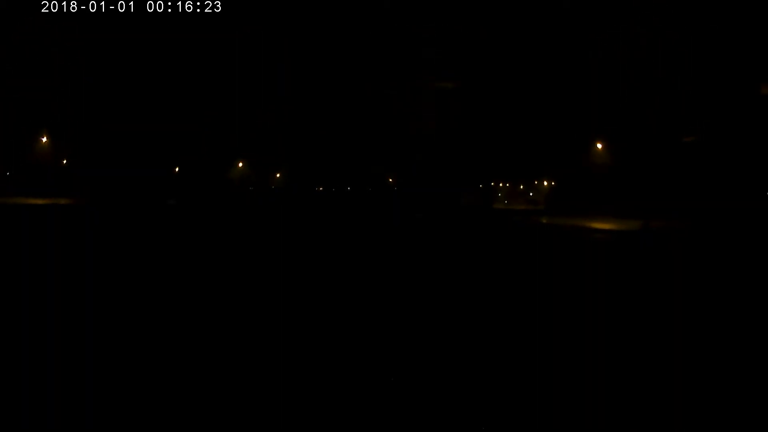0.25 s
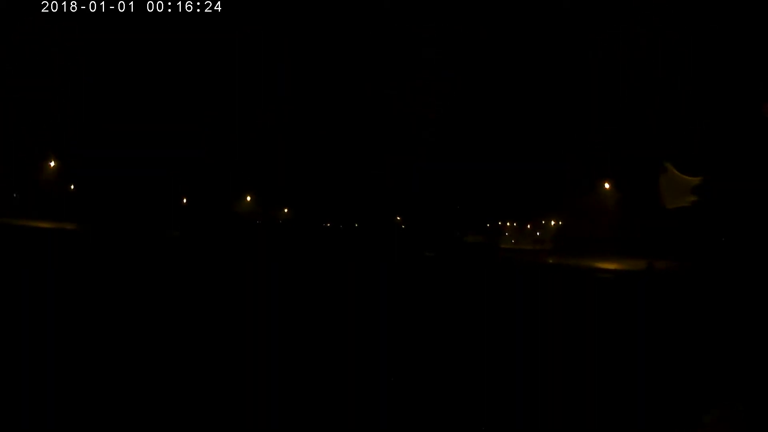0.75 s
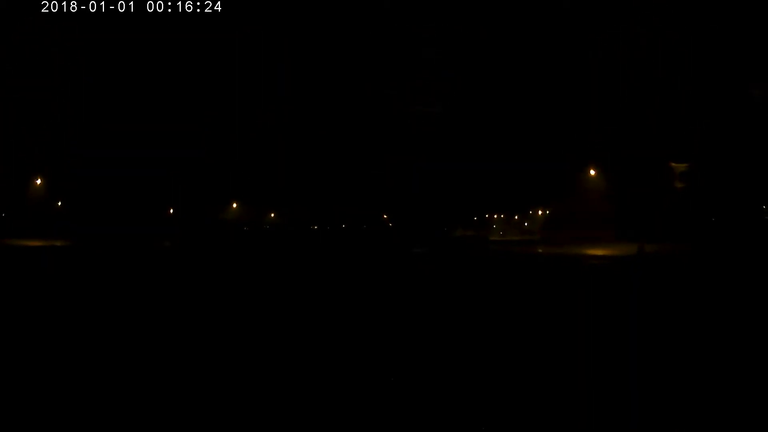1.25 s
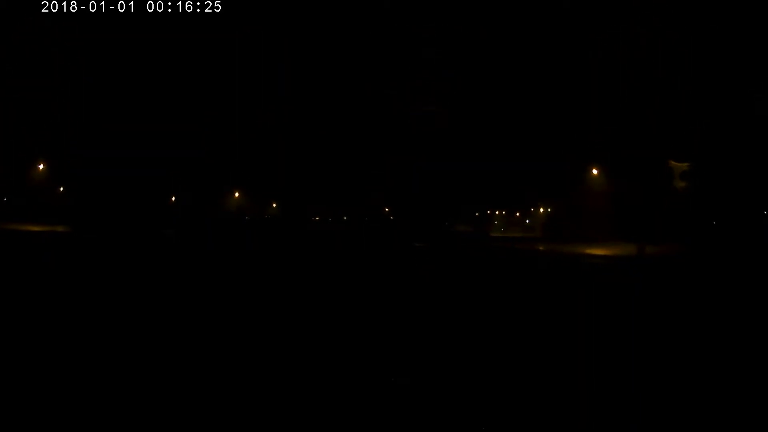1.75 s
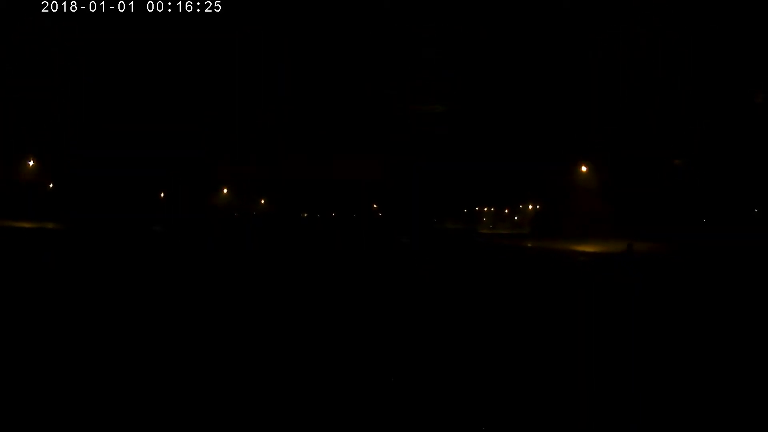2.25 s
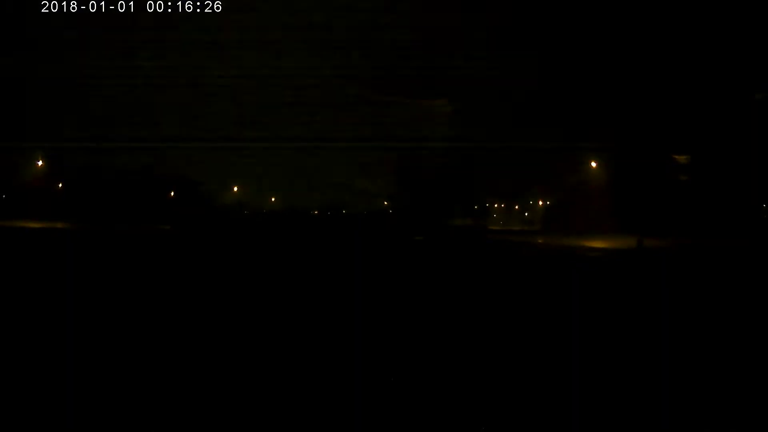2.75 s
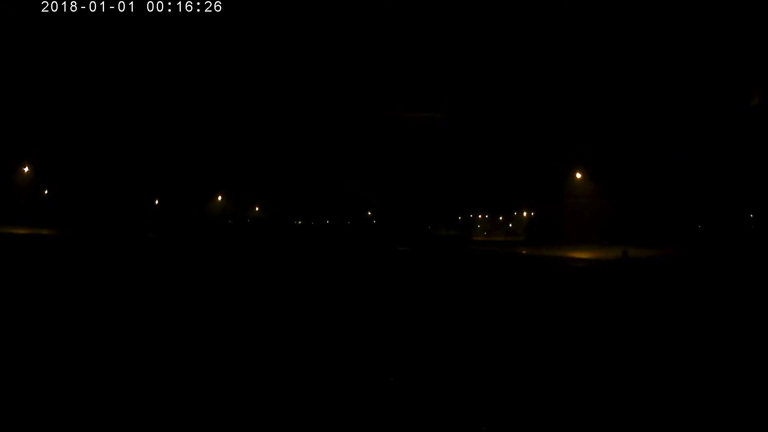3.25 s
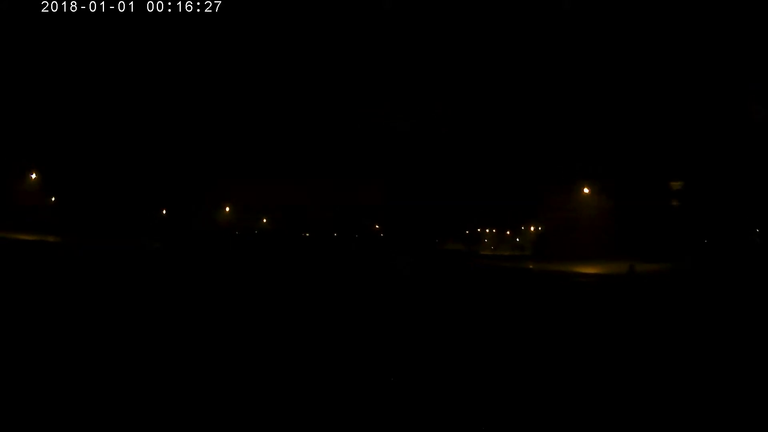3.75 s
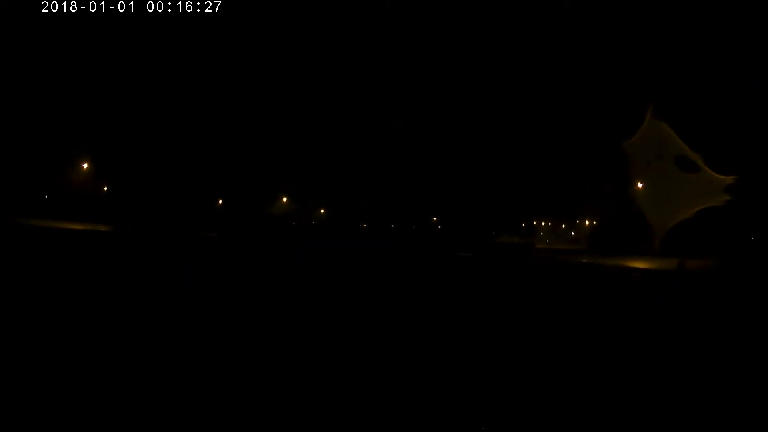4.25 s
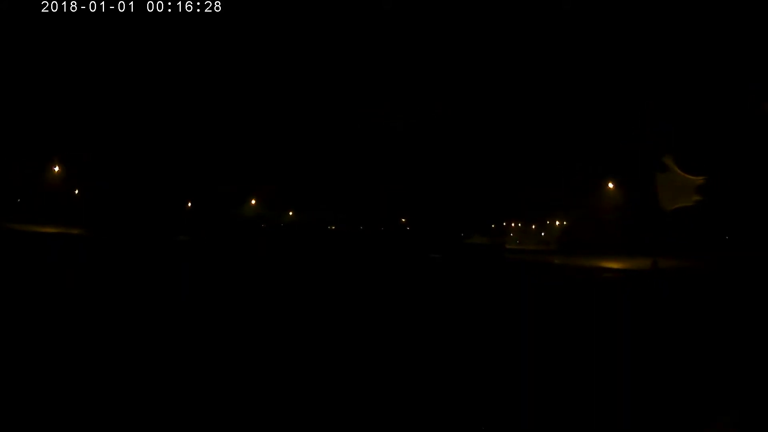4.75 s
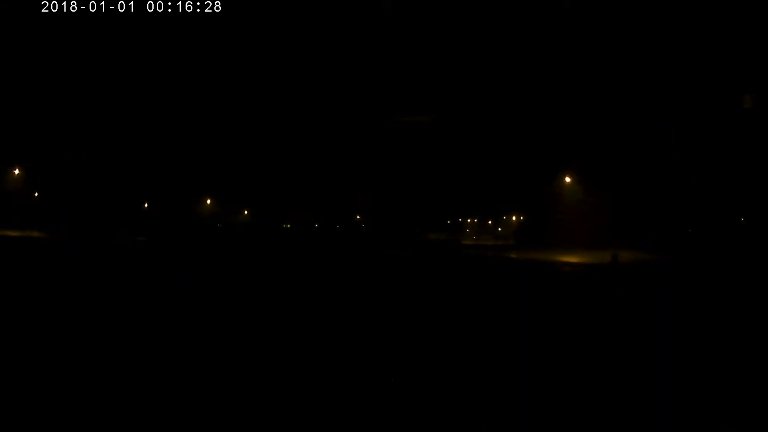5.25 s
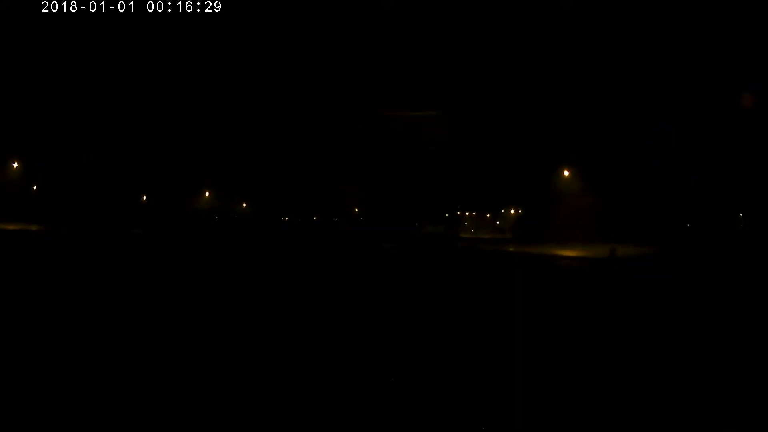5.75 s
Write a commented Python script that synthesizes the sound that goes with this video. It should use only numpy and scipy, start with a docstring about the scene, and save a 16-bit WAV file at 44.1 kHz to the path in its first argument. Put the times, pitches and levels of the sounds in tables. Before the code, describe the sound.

Outdoors at night, rain falls on a plastic cover around the microphone. Sharp, dry, irregular taps of every strength come without pause, the largest loud and slightly distorted. Fine patter and a faint wash of ground rain lie beneath, with soft low flaps of the sheet and wind rumble. The sound is close and dull in the treble.

```python
"""Rain on a plastic cover

Each large drop is an impact that excites a few damped modes of the cover; small drops patter between
them over a wash of rain on the ground. The slack sheet flaps in low thuds, and wind heaves and rumbles
at the microphone. The microphone is dull in the treble, faint bands fall silent, more of them just
after loud blows, and the largest drops overload the recorder."""
import sys
import numpy as np
from scipy import signal
from scipy.io import wavfile
from scipy.ndimage import uniform_filter1d

SR = 44100
rng = np.random.default_rng(int(sys.argv[2]) if len(sys.argv) > 2 else 0)


def file_out(sig):
    """Save sig as 16-bit WAV at sys.argv[1]."""
    # one column per channel
    cols = np.atleast_2d(sig).T
    # limit, then scale
    lim = np.clip(cols, -1, 1)
    pcm = np.round(lim * 32767).astype(np.int16)
    wavfile.write(sys.argv[1], SR, pcm)


N = 264600  # samples, 6 s


def amp(db):
    """Decibel law: amplitude gain of a level in dB."""
    return 10 ** (np.asarray(db) / 20)


def evened(x):
    """Normalisation: scales a signal to an rms of 1."""
    return x / np.sqrt(np.mean(x ** 2) + 1e-20)


def over_time(rows):
    """Level envelope: gain at every sample, linear in dB between rows of start_s, level_db."""
    start_s, level_db = np.transpose(rows)
    return amp(np.interp(np.arange(N) / SR, start_s, level_db))


def noise(colour, patchy_db, size):
    """Spectral synthesis: random short-time spectra of a given colour and drifting patches, at rms 1."""
    bin_hz = np.fft.rfftfreq(size, 1 / SR)
    pitch_hz, density_db = np.transpose(colour)
    frames = 4 * N // size + 5
    real, imaginary, patches = rng.standard_normal((frames, len(bin_hz), 3)).T
    patches = uniform_filter1d(patches, size=12, axis=0)  # smooth across frequency
    patches = evened(uniform_filter1d(patches, size=8, axis=1))  # smooth across time
    colour_db = np.interp(np.log(bin_hz + 1), np.log(pitch_hz + 1), density_db)[:, None]
    spectra = (real + 1j * imaginary) * amp(colour_db + patchy_db * patches)
    return evened(signal.istft(spectra, nperseg=size, noverlap=3 * size // 4)[1][:N])


# Modes of the cover in five groups: low, boxy, upper, top, main pair.
# Columns: pitch_hz [Hz, before detuning], level_db [dB, before the group's level], t60_s [s]
COVER_MODES = [
    [(210, -2.5, 0.014), (363.8, 6.5, 0.023)],
    [(797.3, 6.5, 0.014)],
    [(1640, 8, 0.007), (2392, -7.5, 0.022), (2860, -19.5, 0.026)],
    [(3159, 3.5, 0.0089), (3360, -2, 0.019), (4290, -0.5, 0.0059)],
    [(1109, 2.5, 0.022), (1432.8, 0.5, 0.018)],
]


def cover(start_s, blow_db, place_db, splash_s, detune):
    """Modal synthesis: a blow rings damped sines, whose balance and tuning vary with the landing spot."""
    t = np.arange(1800) / SR
    chance = rng.standard_normal((len(start_s), 2, sum(map(len, COVER_MODES))))
    place_db = np.column_stack([place_db, np.zeros(len(start_s))])  # the main pair stays at 0 dB
    rings = np.zeros((len(start_s), len(t)))
    k = 0
    for group, modes in enumerate(COVER_MODES):
        for pitch_hz, level_db, t60_s in modes:
            detuned_hz = pitch_hz * (1 + detune * chance[:, 0, k, None])
            phase = 2 * np.pi * detuned_hz * t + .3 * chance[:, 1, k, None]
            decay = amp(place_db[:, group, None] + level_db - 60 * t / t60_s)
            rings += decay * np.sin(phase)
            k += 1
    rings *= 1 - np.exp(-(t / splash_s) ** 2)  # the drop takes a moment to flatten
    out = np.zeros(N + len(t))
    at = np.round(start_s * SR).astype(int)[:, None] + np.arange(len(t))
    np.add.at(out, np.clip(at, 0, len(out) - 1), -amp(blow_db)[:, None] * rings)
    return out[:N]


# Colour of rain on the ground. Columns: pitch_hz [Hz], density_db [dB per Hz, relative]
WASH_COLOUR = [(59, -50.5), (100, -2.5), (378, -5.5), (472, -11), (875, -9), (1110, -5), (1280, -16),
               (1900, -15), (2740, -24), (3260, -11), (4400, -57), (5720, -96.5), (9680, -120)]
# Course of small and far drops. Columns: start_s [s], level_db [dB, before each layer's trim]
PATTER_LEVEL = [(0.0, -42), (1.02, -47), (1.29, -51.5), (1.64, -44.5), (2.22, -48.5), (2.37, -44.5),
                (3.32, -43), (3.68, -46.5), (3.98, -44.5), (4.16, -46.5), (4.48, -50.5), (4.91, -40),
                (5.03, -47.5), (5.65, -53), (5.76, -46), (6.0, -45)]
PATTER_PER_S = 68  # small drops per second


def patter():
    """Random arrivals: many small drops at chance moments, a few stronger, over a wash of far rain."""
    draws = rng.random((int(PATTER_PER_S * N / SR), 6))
    start_s = draws[:, 0] * N / SR
    size_db = -5.5 * np.log(1 - .98 * draws[:, 1])  # exponential spread: strong drops are rare
    # low, boxy, upper and top levels, each up to 7 dB either way
    place_db = np.array([-7.0, -5.5, -2, -21.5]) + 14 * (draws[:, 2:] - .5)
    taps = cover(start_s, size_db, place_db, splash_s=0.0005, detune=0.053)
    wash = noise(WASH_COLOUR, patchy_db=5.0, size=1024)
    return over_time(PATTER_LEVEL) * (amp(-0.5) * evened(taps) + amp(0.5) * wash)


# Course of the heave. Columns: start_s [s], level_db [dB]
WIND_LEVEL = [(0.0, -31), (0.13, -38), (0.2, -29.5), (0.25, -42), (1.12, -34.5), (2.82, -45.5),
              (2.86, -32.5), (3.74, -48.5), (3.84, -30), (4.19, -46), (5.97, -50.5), (6.0, -56)]
# Colour of the heave. Columns: pitch_hz [Hz], density_db [dB per Hz, relative]
GUST_COLOUR = [(4, 0.5), (14, 5), (30, 6.5), (50, -17.5), (90, -42)]
# Colour of the rumble. Columns: pitch_hz [Hz], density_db [dB per Hz, relative]
RUMBLE_COLOUR = [(25, -28.5), (50, -2.5), (120, 1), (250, -8), (500, -31.5)]
RUMBLE_DB = -45.5  # rms level


def wind():
    """Flow noise: slow heave of air at the microphone port, and a lumpy rumble above it."""
    heave = over_time(WIND_LEVEL) * noise(GUST_COLOUR, patchy_db=2.0, size=8192)
    return heave + amp(RUMBLE_DB) * noise(RUMBLE_COLOUR, patchy_db=6.0, size=2048)


# Flaps of the slack sheet. Columns: start_s [s], level_db [dB, before a 5.5 dB lift], pitch_hz [Hz]
FLAPS = [(0.015, -23, 66), (0.086, -25, 45.4), (0.229, -28, 141), (0.518, -28, 117), (0.799, -26.5, 104),
         (1.481, -27, 65.4), (1.815, -30, 75.5), (2.747, -31, 92), (2.869, -30.5, 112.5), (3.189, -30, 99),
         (3.838, -28.5, 73), (4.716, -27.5, 45), (5.035, -24, 120.4), (5.432, -51, 113),
         (5.545, -58, 120.6)]


def thuds():
    """Damped oscillation: each flap of the slack sheet is a few soft low cycles."""
    t = np.arange(6000) / SR
    out = np.zeros(N + len(t))
    for start_s, level_db, pitch_hz in FLAPS:
        decay = amp(level_db + 5.5 - 60 * t / 0.089)
        onset = 1 - np.exp(-t / 0.0033)
        out[round(start_s * SR):][:len(t)] -= decay * onset * np.sin(2 * np.pi * pitch_hz * t)
    return out[:N]


# Large drops; the last three columns depend on where the drop lands.
# Columns: start_s [s], blow_db [dB], hollow_db [dB], bright_db [dB], crisp_db [dB]
LARGE_DROPS = [(0.0275, -15.5, 4, -23, -9), (0.1039, -1, -4.5, -1, -15.5), (0.228, -27, -3, 3, -10),
               (0.2421, -5, -3, -7.5, -11.5), (0.303, -14, -5, 2.5, -12), (0.442, -28.5, -1, -9, -39),
               (0.466, -12, -4, -12.5, -41), (0.4754, -30, -4.5, 8, 1), (0.5333, -30, 8, -3, -23),
               (0.5481, -15, -9.5, -8, -9), (0.601, -13.5, -11, -18, -16), (0.6662, -25, -11, -1.5, -7.5),
               (0.7328, -19, -17.5, -3.5, -12.5), (0.7968, -26, 3, -5.5, -1.5),
               (0.8128, -11.5, -8, -0.5, -8.5), (0.8418, -23.5, 5.5, -3, -9.5), (0.9046, -13, -5, -6, -16),
               (0.9205, -20.5, -9, -12, -4.5), (0.9379, -17.5, -6, -16, -11), (1.052, -33, 2, -7, -3),
               (1.0605, -4, -14.5, -1, -3), (1.0994, -26.5, -1, -1, 1.5), (1.1542, -3, -15.5, -17, -14.5),
               (1.1724, -10, -6, -10, -9), (1.191, -27.5, 2, 2, 0), (1.1987, -23, -10, -8, -9),
               (1.2804, -19, -6, -9, -14.5), (1.2954, -19, -0.5, -7, -8), (1.3797, -7.5, -17, -16, -15.5),
               (1.476, -30, 3, -7, -7), (1.482, -26, 1.5, -1.5, -7), (1.5269, -29, -2, -18, -44),
               (1.6045, -3, -10.5, -14, -21), (1.671, -25.5, -2, 2, -12.5), (1.6832, -27.5, -9, -21, -21),
               (1.7639, -11.5, -4, -7, -21.5), (1.8386, -25, -17, 5, -4), (1.9807, -15, -18, -2, -14),
               (1.99, -30.5, 3.5, 16, -11), (2.0019, -25, -20, -3, 1.5), (2.0408, -22, 7, -24, -19),
               (2.1256, -20.5, -14, -2, -23), (2.1685, -22, -8, -9.5, -22), (2.2039, -13.5, -3, 1.5, -19),
               (2.2283, -7.5, -9, -13, -23), (2.3021, -19, -9.5, -17, -20), (2.4193, -27, -5, -10, -26),
               (2.471, -23, -7, -19, -18), (2.4788, -20.5, -8, -16, -16), (2.536, -27, 2, 4, -3),
               (2.5513, -25, 6.5, -5, -20), (2.579, -19.5, -1.5, -16, -33), (2.647, -7, -19, 1.5, -3.5),
               (2.6512, -19, -6, -11, -29), (2.6639, -16, -6, 2, -2), (2.7488, -23, -9, -7, -10),
               (2.7542, -22.5, 3.5, -21, -21.5), (2.7706, -23.5, -9, -1, -28), (2.782, -24.5, -4, -3, -7),
               (2.8582, -22, -12, -1, -7), (2.8684, -20, -9, -16, -12), (2.8818, -8, 1.5, 3, -11.5),
               (2.9029, -18, 3.5, -28, -27), (2.9261, -12.5, -0.5, -4, -9), (2.9313, -1, 0.5, -4.5, -15),
               (3.0239, -17, -13, 0.5, -25), (3.0448, -16, -11, 1, -16), (3.1028, -25.5, -10, -16, -12),
               (3.155, -36, -11, 6, 10.5), (3.193, -25, -2, 0.5, -13), (3.2245, -28, 4, -11, -15),
               (3.3154, -21.5, -5, 7, -21), (3.3279, -3.5, -7, -9.5, -6), (3.3754, -26, 4, 3.5, -48),
               (3.387, -33.5, 15, 4, -2), (3.404, -11.5, -16, -1, -1.5), (3.4643, -2, -13.5, -6.5, -9.5),
               (3.502, -34.5, -10, -14, -36), (3.5971, 0, -16, -5.5, -12), (3.6159, -30, -7, -3, 7),
               (3.6358, -18.5, -17, 2, -28), (3.6522, -10.5, -7.5, -3, -11), (3.778, -27.5, -8, 4, -18),
               (3.798, -10.5, -7, -4, -12.5), (3.817, -23.5, -6, -3, -15), (3.8603, -24, -1, -5, -10.5),
               (3.9063, -28.5, -10, 4.5, 2.5), (3.912, -24.5, -4, -21, -15), (3.9385, -24.5, 1.5, -17, -31),
               (4.0259, -2, -9.5, -15, -18.5), (4.0929, -9, -24, -2.5, -15),
               (4.1217, -15.5, -0.5, -2, -13.5), (4.1384, -19, -12, -9, -1), (4.3002, -28.5, -7, -8, -15.5),
               (4.3776, -23.5, -10, -20, -47), (4.4047, -16.5, -8.5, -5, 0), (4.444, -27.5, 0.5, -10, -36),
               (4.5121, -27.5, 0.5, -7, -10), (4.6259, -26, -5, -1, 2.5), (4.6818, -29, -5, -5, -2),
               (4.6966, -28.5, -2, -19.5, -29), (4.7191, -22, -6, -19, -12),
               (4.7293, -2, -5.5, -24.5, -14.5), (4.828, -15.5, -9.5, -14, -23),
               (4.8566, -22, -4.5, -14, 6.5), (4.8678, -21, -1, -16, 1), (4.8798, -2, -13, -9, -16.5),
               (4.894, -24.5, -18, -17, 1.5), (4.9122, -20, -22, -13, -26.5), (5.0015, -28.5, 5, -6, 2),
               (5.0265, -9, -11.5, -1, -0.5), (5.0478, -19, 8, 2.5, 4.5), (5.1321, -9, -24, -31.5, -11.5),
               (5.163, -18.5, -2.5, -24, -45), (5.2845, -17, -23, 4, -7.5), (5.3339, -11, -7.5, -12, -12.5),
               (5.3613, -26.5, -12, 3, -9), (5.392, -20.5, -7, -11.5, -13), (5.4067, -21.5, -17.5, -18, -1),
               (5.4465, -31, 21.5, 4.5, 2.5), (5.5389, -24, -7, 10.5, -1.5),
               (5.5514, -31.5, 3.5, -15.5, -9), (5.5606, -4, -8.5, -2.5, -5), (5.678, -27.5, -12, -5, -44),
               (5.7138, -27.5, -11, -11, -5), (5.7237, -12.5, -16, -4.5, -5.5), (5.7412, -19, -6, -6, -39),
               (5.7703, -26, -6, -29, -31), (5.8184, -30, 2, 2, -8), (5.8297, -4, -10.5, -4, -21),
               (5.8961, -33, 17, -15, -40), (5.915, -29.5, -11, 5, 0), (5.9327, -2.5, -11.5, -1.5, -7.5)]
LOW_DB, BOXY_DB, UPPER_DB, TOP_DB = -6.5, -3.5, -0.5, -1  # group levels where those columns are 0
SCATTER_DB = 2.5  # chance on the boxy mode
BOXY_SHARE, BOXY_MOST_DB = 0.57, 2  # boxy dB per dB of hollowness; hollowness at which it stops rising


def drops():
    """Impact excitation: large drops tap the cover, throw off droplets and leave a faint rattle."""
    start_s, blow_db, hollow_db, bright_db, crisp_db = np.transpose(LARGE_DROPS)
    boxy_db = BOXY_DB + BOXY_SHARE * np.minimum(hollow_db, BOXY_MOST_DB)
    boxy_db = boxy_db + SCATTER_DB * rng.standard_normal(len(start_s))
    place_db = np.transpose([LOW_DB + hollow_db, boxy_db, UPPER_DB + bright_db, TOP_DB + crisp_db])
    taps = cover(start_s, blow_db, place_db, splash_s=0.0005, detune=0.028)

    late, small = rng.random((len(start_s), 4, 2)).T  # four droplets a drop
    lands_s = start_s + .003 + 0.027 * late ** 0.84
    spray_db = blow_db - 21 - 14 * late - 8 * small  # later droplets are weaker
    spray_place_db = np.tile(place_db + 4.5, (len(late), 1))
    spray = cover(lands_s.ravel(), spray_db.ravel(), spray_place_db, splash_s=0.000067, detune=0.037)

    t = np.arange(2000) / SR
    rattle = rng.standard_normal(len(t)) * amp(-60 * t / 0.041) * (t > .004)  # starts 4 ms late
    rattle = rattle / np.linalg.norm(rattle)
    return taps + spray + amp(-16.0) * signal.oaconvolve(taps, rattle)[:N]


def scene():
    """Superposition: patter, wind, flaps and large drops add at one microphone."""
    return (patter() + wind() + thuds() + drops())[None]


# Level under which faint bands fall silent, at rest. Columns: pitch_hz [Hz], level_db [dB]
FAINT_LEVEL = [(300, -110), (700, -81), (1500, -82), (2500, -76), (4000, -87)]


def fade_faint(x):
    """Spectral gating: faint bands fall silent, more of them just after loud blows."""
    bin_hz, t, spectra = signal.stft(x, SR, nperseg=1024, noverlap=768)
    power = uniform_filter1d(abs(spectra) ** 2, size=17, axis=1)  # smooth across frequency
    power = uniform_filter1d(power, size=3, axis=2)  # smooth across time
    loud_db = 10 * np.log10((abs(spectra) ** 2).sum(1) + 1e-20)
    fall_db = 38.8 * t  # the effect of a blow fades by 38.8 dB a second, before the 0.85 share
    held_db = np.maximum.accumulate(loud_db + fall_db, axis=1) - fall_db
    raised_db = 0.85 * np.maximum(held_db + 34.5, 0)
    pitch_hz, level_db = np.transpose(FAINT_LEVEL)
    threshold_db = np.interp(bin_hz, pitch_hz, level_db)[:, None] + raised_db[:, None]
    over_db = 10 * np.log10(abs(power) + 1e-20) - threshold_db
    gate = 1 / (1 + amp(-5.0 * np.clip(over_db, -30, 30)))
    return signal.istft(spectra * gate, nperseg=1024, noverlap=768)[1][:, :N]


MIC_HZ = 4850  # the microphone's response has died away here
CEILING = .72  # overload limit, full scale 1
EDGE_HZ = 16700  # band limit


def record(dry):
    """Band limiting and saturation: dull microphone, fading of faint bands, soft overload, band limit."""
    dull = signal.sosfilt(signal.cheby2(14, 75, MIC_HZ, fs=SR, output="sos"), dry)
    heard = fade_faint(dull)
    knee = .88 * CEILING  # linear below the knee, squashed against the ceiling above it
    room = CEILING - knee
    over = np.maximum(abs(heard) - knee, 0)
    clipped = heard - np.sign(heard) * (over - room * np.tanh(over / room))
    band_limit = signal.firwin(511, EDGE_HZ, window=("kaiser", 9), fs=SR)
    return signal.oaconvolve(clipped, band_limit[None], "same")


dry = scene()
out = record(dry)
file_out(out)
```